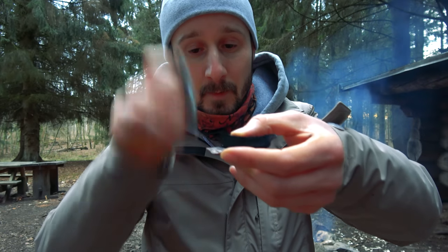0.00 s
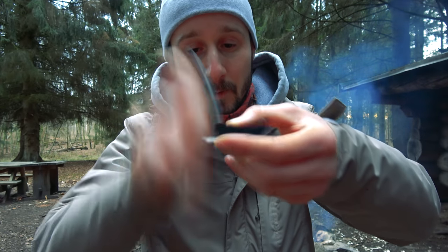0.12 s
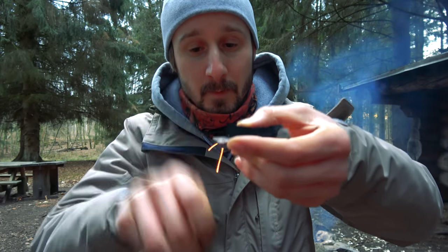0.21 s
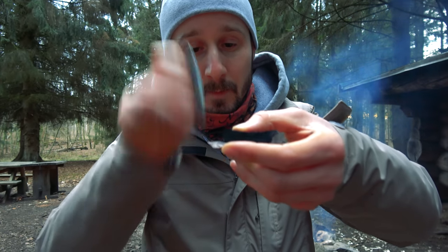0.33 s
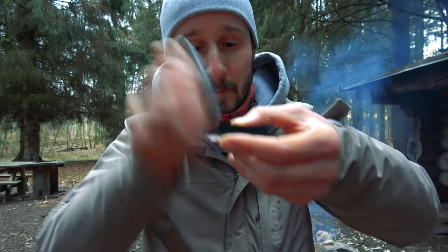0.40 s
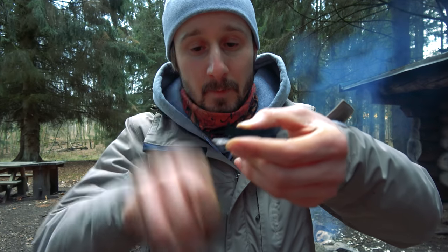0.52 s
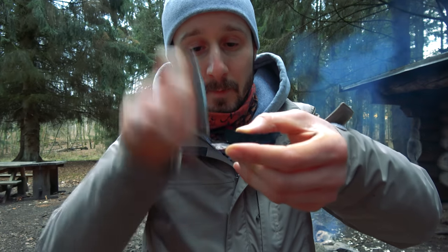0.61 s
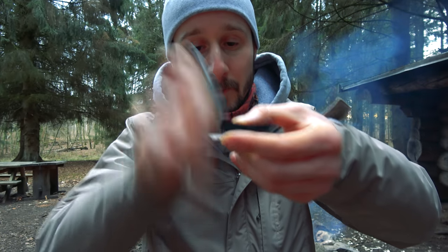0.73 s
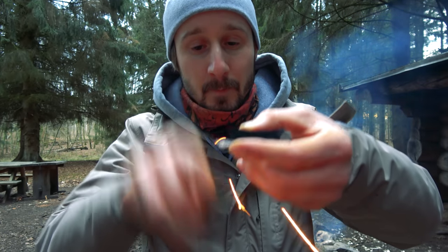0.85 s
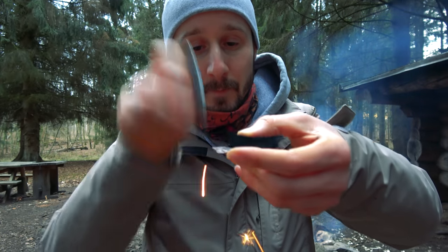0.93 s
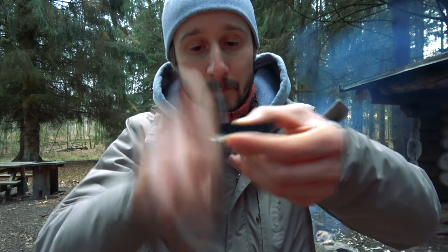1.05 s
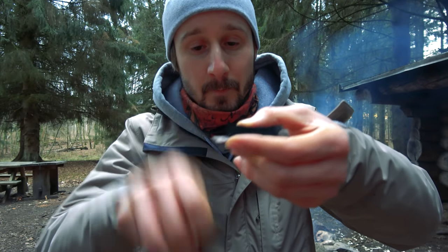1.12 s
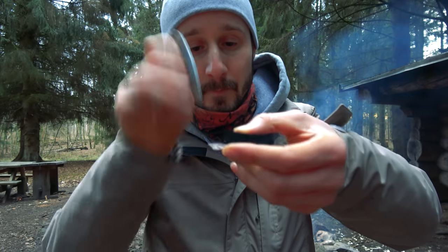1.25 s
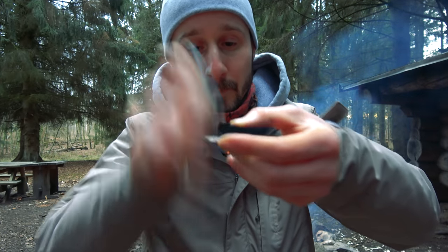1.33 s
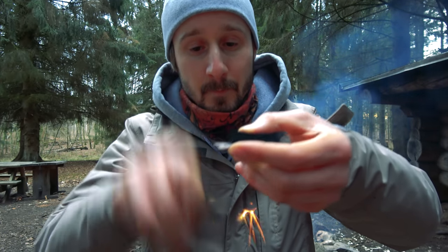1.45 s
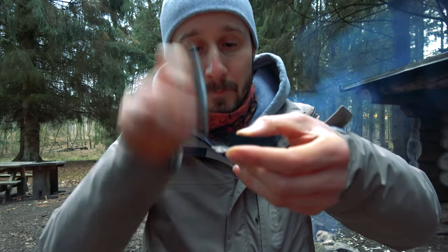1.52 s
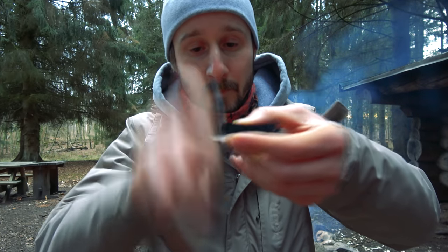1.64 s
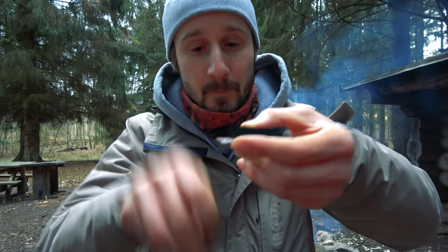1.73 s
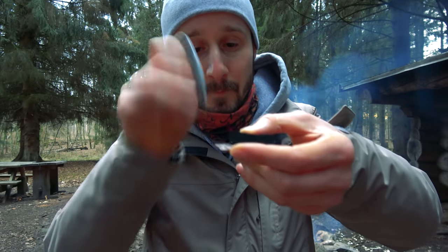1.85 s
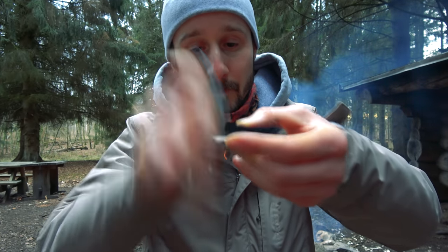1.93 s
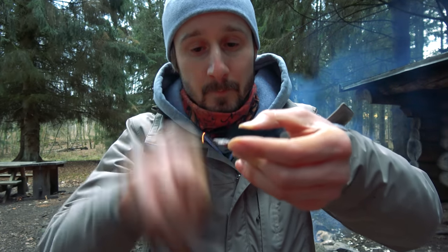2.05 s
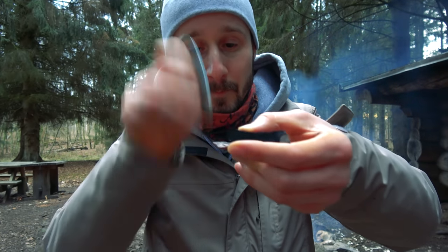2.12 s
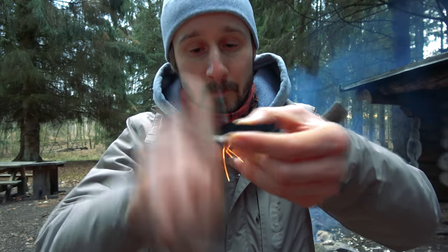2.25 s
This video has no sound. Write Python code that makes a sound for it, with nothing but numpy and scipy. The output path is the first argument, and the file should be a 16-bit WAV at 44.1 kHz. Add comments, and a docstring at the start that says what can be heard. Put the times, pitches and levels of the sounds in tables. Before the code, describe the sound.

A steel striker hits and scrapes a hand-held flint seven times at a steady pace, each a sharp crack with a tiny gritty rasp; soft cloth rustles between, close microphone in a quiet forest clearing.

```python
"""A steel fire striker is swung down the edge of a hand-held flint seven times, close by, in a quiet forest clearing.
Each stroke is an impulse (crack) and about 25 ms of gritty friction (scrape), both exciting damped modes;
the stone's edge chatters, each bite squeaks by stick-slip, and the passing hand leaves a low puff of air.
Light touches are weaker impulses on the same modes, and soft knocks pass through the hands.
A sleeve rustles and a jacket crinkles as shaped noise in steady air; decaying noise gives the trees' faint tail."""
import sys
import numpy as np
from scipy import signal
from scipy.fft import rfft, irfft, next_fast_len
from scipy.io import wavfile

SR = 44100
rng = np.random.default_rng(int(sys.argv[2]) if len(sys.argv) > 2 else 0)


def file_out(sig):
    """Save sig as 16-bit WAV at sys.argv[1]."""
    # one column per channel
    cols = np.atleast_2d(sig).T
    # limit, then scale
    lim = np.clip(cols, -1, 1)
    pcm = np.round(lim * 32767).astype(np.int16)
    wavfile.write(sys.argv[1], SR, pcm)


N = 101430   # samples in the scene
SPAN = 16384   # samples in one event
AGE = np.arange(SPAN) / SR   # s since the event began
TIME = np.arange(N) / SR   # s since the scene began


def from_db(db):
    """Logarithmic level: decibels become an amplitude ratio."""
    return 10 ** (np.asarray(db) / 20)


def add(out, start_s, x):
    """Superposition: sound x is summed into out from its start time."""
    i = max(int(start_s * SR), 0)
    out[i:i + len(x)] += x[:len(out) - i]


def coloured(x, points):
    """Minimum-phase filtering: the (hz, gain_db) curve fixes a causal response through its cepstrum."""
    size = 2 * next_fast_len(len(x))
    hz, gain_db = np.transpose(points)
    bin_hz = np.maximum(np.arange(size // 2 + 1) * SR / size, 1)
    gain = from_db(np.interp(np.log(bin_hz), np.log(hz), gain_db))
    cepstrum = irfft(np.log(gain))
    # Folding the negative half onto the positive half makes the filter causal
    cepstrum[1:size // 2] *= 2
    cepstrum[size // 2 + 1:] = 0
    response = np.exp(rfft(cepstrum))
    return irfft(rfft(x, size) * response)[:len(x)]


def noise(points):
    """Filtered random noise: a spectrum without pitch, scaled to rms 1."""
    x = coloured(rng.standard_normal(N + SPAN), points)[SPAN:]   # drops the filter's onset
    return x / x.std()


def ring(force, hz, t60_s):
    """Damped resonance: a unit click sets off a cosine of height 1 that falls 60 dB in t60_s."""
    decay = from_db(-60 / (t60_s * SR))   # per sample
    angle = 2 * np.pi * hz / SR
    zeros = [1, -decay * np.cos(angle)]
    poles = [1, -2 * decay * np.cos(angle), decay * decay]
    return signal.lfilter(zeros, poles, force + 1e-18)   # tiny offset avoids denormal numbers


def bump(t, centre_s, width_s):
    """Gaussian envelope: a bell-shaped swell of height 1, with width_s its standard deviation."""
    return np.exp(-.5 * ((t - centre_s) / width_s) ** 2)


# Spectrum of the outdoor air: pitch_hz, level_db
AIR_SPECTRUM = [(12, -14.5), (20, 8.5), (74, -2.5), (154, -3), (328, -10.5), (527, -13), (873, -13.5),
                (1000, -14), (1440, -20.5), (1610, -21), (3950, -26.5), (4420, -25.5), (6360, -27.5),
                (8180, -27), (16000, -41.5)]


def air():
    """Stationary noise: steady outdoor air of fixed spectrum."""
    return from_db(-48) * noise(AIR_SPECTRUM)


# Swells of the sleeve: centre_s, width_s, level_db
SLEEVE_RUSTLES = [(.14, 0.12, -53.5), (.6, .03, -51), (.79, 0.05, -47.5), (1.04, 0.046, -57),
                  (1.627, 0.011, -43.5), (1.675, 0.018, -49), (1.83, 0.033, -51.5), (1.95, 0.025, -52)]
# Spectrum of the sleeve: pitch_hz, level_db
SLEEVE_SPECTRUM = [(30, -9), (90, -3.5), (160, 7.5), (290, 0.5), (450, -11.5), (1000, -16), (3000, -30),
                   (16000, -43.5)]


def sleeve():
    """Amplitude-modulated friction noise: the swinging sleeve rustles in smooth swells."""
    swells = sum(from_db(db) * bump(TIME, centre_s, width_s) for centre_s, width_s, db in SLEEVE_RUSTLES)
    return swells * noise(SLEEVE_SPECTRUM)


# Swells of the dry jacket: centre_s, width_s, level_db
JACKET_CRINKLES = [(.075, 0.0095, -59), (.12, 0.011, -54.5), (.375, 0.011, -55.5), (0.458, 0.0059, -53.5),
                   (.695, 0.0055, -52.5), (0.819, 0.0019, -47), (.966, 0.0091, -54.5),
                   (1.059, 0.0087, -54.5), (2.233, 0.0061, -50)]
# Spectrum of the jacket: pitch_hz, level_db
JACKET_SPECTRUM = [(300, -25), (1500, 5.5), (4000, -1.5), (8000, 1), (12000, -4), (16000, -4)]
CRINKLE_ROUGH_DB, CRINKLE_GRAIN_S = 4.5, 0.001   # spread and spacing of the random level


def jacket():
    """Irregular modulation: a random level every millisecond roughens the noise of dry crinkling cloth."""
    swells = sum(from_db(db) * bump(TIME, centre_s, width_s) for centre_s, width_s, db in JACKET_CRINKLES)
    rough = np.interp(TIME / CRINKLE_GRAIN_S, np.arange(N), rng.standard_normal(N))
    return swells * from_db(CRINKLE_ROUGH_DB * rough) * noise(JACKET_SPECTRUM)


GRAINS_PER_S, GRAIN_SPREAD_DB = 9000, 5.5


def grit():
    """Random impulse train: dense micro-fractures of uneven size and either sign, scaled to rms 1."""
    spread = np.clip(rng.standard_normal(SPAN), -2, 2)
    sizes = from_db(GRAIN_SPREAD_DB * spread) * rng.choice([-1, 1], SPAN)
    grains = sizes * (rng.random(SPAN) < GRAINS_PER_S / SR)
    return grains / grains.std()


# Spectrum of the crushed grit: pitch_hz, level_db
CRUSH_SPECTRUM = [(300, -21), (1500, -4), (4000, -1.5)]
CRUSH_DB, CRUSH_DECAY_S = -9, .001


def blow():
    """Impulsive excitation: one sharp click, then a short decaying crush of grit."""
    crush = coloured(grit() * np.exp(-AGE / CRUSH_DECAY_S), CRUSH_SPECTRUM)
    return np.where(AGE == 0, 1, from_db(CRUSH_DB) * crush)


# Damped modes of the gripped steel and stone: pitch_hz, level_db (relative), t60_s
BODY_MODES = [(1500, -20.5, 0.013), (2044, -8, 0.015), (2644, -4.5, 0.011), (3150, -6, 0.0065),
              (3810, -6.5, 0.0053), (4155, -9, 0.017), (4634, -3, .013), (5370, -14.5, .010),
              (7180, 0, 0.0053), (8080, 6.5, 0.0058), (10630, 2, 0.01), (11010, -0.5, 0.0081),
              (12250, -6, .007), (15200, -14, .007)]
# Faint after-ring of the steel: pitch_hz, level_db (relative), t60_s
STEEL_AFTER_RING = [(4575, -57, .2), (10750, -51, .3), (10930, -51, .3), (11120, -49, .25)]
CLACK_HZ, MIDDLE_LOW_HZ, MIDDLE_HIGH_HZ, SHEEN_HZ = 2000, 4200, 7400, 10500
GRIP_SPREAD_DB, GRIP_DETUNE = 2.0, 0.0043   # greatest change either way; detune is a fraction
DIRECT_DB = 11.5


def steel_on_flint(force, spectrum, clack_db, sheen_db):
    """Modal excitation: the contact point balances low clack and high sheen; force sounds directly and in modes."""
    balance = [(CLACK_HZ, clack_db), (MIDDLE_LOW_HZ, 0), (MIDDLE_HIGH_HZ, 0), (SHEEN_HZ, sheen_db)]
    force = coloured(coloured(force, spectrum), balance)
    body = np.zeros(SPAN)
    for hz, db, t60_s in BODY_MODES:
        # The grip alters each mode's level and pitch from contact to contact
        level_shift, pitch_shift = rng.uniform(-1, 1, 2)
        gain = from_db(db + GRIP_SPREAD_DB * level_shift)
        body += gain * ring(force, hz * (1 + GRIP_DETUNE * pitch_shift), t60_s)
    after = sum(from_db(db) * ring(force, hz, t60_s) for hz, db, t60_s in STEEL_AFTER_RING)
    return from_db(DIRECT_DB) * force + (body + after) / 2


# Light touches and ticks: start_s, level_db (relative), clack_db, sheen_db, pitch_hz
LIGHT_TOUCHES = [(0.0263, -31, 4.5, -13, 1750), (.0310, -37, 5, -5, 1560), (.3290, -41, 2, -14, 1700),
                 (0.3924, -32.5, 3, -14, 2850), (.6524, -15, -3.5, -10.5, 2170),
                 (1.0012, -37.5, -1.5, -11, 1620), (1.0132, -37, 6, -3.5, 2200),
                 (1.089, -45.5, 5, -2, 3020), (1.5464, -38.5, 5, -8, 2970), (1.55, -37.5, -3, -8, 2320),
                 (2.0605, -42, 13, -20, 2300), (2.0911, -38, 0.5, -6.5, 2930),
                 (2.1822, -24.5, 7.5, -16, 1320), (2.2291, -46.5, 9, -13, 2700)]
# Spectrum of a light contact: pitch_hz, level_db
TOUCH_SPECTRUM = [(100, -15.5), (500, 2.5), (1000, 8.5), (1500, 7.5), (2300, -3.5), (3600, -2.5),
                  (4650, -4), (5500, -10), (8400, -0.5), (11000, -2.5), (16000, 5.5)]
TOUCH_DB, TOUCH_RING_DB, TOUCH_RING_T60_S = -6.5, 0, 0.0097


def touches():
    """Weak impact: each light contact excites the shared modes and a short ring of its own pitch."""
    out = np.zeros(N)
    for start_s, db, clack_db, sheen_db, hz in LIGHT_TOUCHES:
        tick = steel_on_flint(blow(), TOUCH_SPECTRUM, clack_db, sheen_db)
        tick = tick + from_db(TOUCH_RING_DB) * ring(AGE == 0, hz, TOUCH_RING_T60_S)
        add(out, start_s, from_db(TOUCH_DB + db) * tick)
    return out


# Scatter from hands and chest, the ground, the trees: level_db, delay_s, t60_s
SCATTERERS = [(-17, 0.00077, 0.025), (-28, 0.013, 0.12), (-34, 0.028, 0.24)]
# Spectrum of the scattered sound: pitch_hz, level_db
SCATTER_SPECTRUM = [(200, -0.5), (1000, 7), (2700, -4.5), (4400, -3), (6000, -2), (8150, -2.5), (9400, 5.5),
                    (10900, -8.5), (12000, -5), (13800, -6), (16000, -9)]


def clearing(close):
    """Diffuse reflection: delayed, decaying noise is convolved with the close sounds."""
    echoes = np.zeros(SPAN)
    for db, delay_s, t60_s in SCATTERERS:
        echo = rng.standard_normal(SPAN) * (AGE > delay_s) * from_db(-60 * AGE / t60_s)
        echoes += from_db(db) * echo / np.linalg.norm(echo)   # unit energy before its level
    return signal.fftconvolve(close, coloured(echoes, SCATTER_SPECTRUM))[:N]


# Soft knocks through the hands: start_s, level_db
HAND_KNOCKS = [(0.215, -27.5), (.518, -46), (0.813, -28.5), (.8224, -29.5), (1.1214, -38), (1.4204, -30),
               (1.7216, -52.5), (2.021, -25)]
# Damped modes of the hands: pitch_hz, level_db (relative to the knock), t60_s
HAND_RESONANCES = [(186.6, 3, 0.0073), (580, 3.5, 0.0063)]


def knocks():
    """Heavily damped resonance: the hands take each blow with a dull, low knock."""
    out = np.zeros(N)
    for start_s, level_db in HAND_KNOCKS:
        for hz, db, t60_s in HAND_RESONANCES:
            add(out, start_s, -from_db(level_db + db) * ring(AGE == 0, hz, t60_s))
    return out


# Instants when the edge bites deeper and the steel squeaks: centre_s, level_db (relative), pitch_hz (squeak)
EDGE_BITES = [(.2247, 8, 11000), (.2305, 5, 10900), (.2330, 6, 11150), (.2380, 3, 8200), (.2400, 6, 10900),
              (.5223, 5, 3700), (.5287, 9, 11200), (.5303, 7, 11400), (.5325, 7, 10700), (.5366, 5, 8000),
              (.8312, 5, 10800), (.8360, 4, 11200), (.8402, 6, 4500), (1.1312, 8, 11200),
              (1.1376, 4, 10950), (1.1444, 5, 4600), (1.4275, 3, 10650), (1.4294, 8, 10900),
              (1.4438, 2, 8100), (1.7433, 3, 11000), (2.0240, 8, 4600), (2.0352, 3, 10800),
              (2.0388, 4, 11100)]
BITE_WIDTH_S, SCRAPE_RISE_S, SCRAPE_RELEASE_S = 0.0013 / 2, 0.0027, 0.00069


def scrape(start_s, length_s):
    """Sliding friction: pressure shapes grit under the steel, and its power surges at each bite."""
    rise = 1 - np.exp(-AGE / SCRAPE_RISE_S)
    release = np.exp(-np.maximum(AGE - length_s, 0) / SCRAPE_RELEASE_S)
    surges = sum(from_db(db) ** 2 * bump(start_s + AGE, centre_s, BITE_WIDTH_S)
                 for centre_s, db, _ in EDGE_BITES)
    return grit() * rise * release * np.sqrt(1 + surges / 2)


CHATTER_DB, CHATTER_T60_S, CHATTER_CENTRE_S, CHATTER_WIDTH_S = -35, .008, .0075, .004


def chatter(hz):
    """Forced resonance: grit rattles the stone's edge at a pitch set by the contact point, then it settles."""
    force = grit() * bump(AGE, CHATTER_CENTRE_S, CHATTER_WIDTH_S)
    return from_db(CHATTER_DB) * ring(force, hz, CHATTER_T60_S)


PUFF_DB, PUFF_DELAY_S, PUFF_WIDTH_S = -33.5, .0395, 0.0027
REFILL_DB, REFILL_DELAY_S, REFILL_WIDTH_S = -37, 0.053, .009


def puff():
    """Aerodynamic pressure pulse: suction behind the passing fist, then air flowing back."""
    suction = from_db(PUFF_DB) * bump(AGE, PUFF_DELAY_S, PUFF_WIDTH_S)
    refill = from_db(REFILL_DB) * bump(AGE, REFILL_DELAY_S, REFILL_WIDTH_S)
    return refill - suction


# Strokes, levels relative: start_s, crack_db, scrape_length_s, scrape_db, crack_clack_db, crack_sheen_db,
# scrape_clack_db, scrape_sheen_db, chatter_hz, chatter_db
STRIKER_STROKES = [(.2160, 0.5, 0.027, -0.5, 0.5, 6, 0, 2.5, 3370, -4),
                   (.5180, -2, 0.022, -1.5, -1.5, -10.5, 1.5, 2.5, 3700, 1.5),
                   (0.822, 3, 0.024, -2, -1, 4, 3, -3, 4380, 7),
                   (1.1211, 3, 0.025, 2, -0.5, -4, 0, -2.5, 5380, 5),
                   (1.4206, 2, 0.025, -2.5, 2.5, -1, 2.5, 1, 2850, -28),
                   (1.7229, 0, 0.023, 0, -4, -11.5, -2.5, -1.5, 1600, 4),
                   (2.019, -2, 0.022, -2.5, 6.5, 4, 8.5, -2.5, 3900, 4)]
# Spectrum of the crack: pitch_hz, level_db
CRACK_SPECTRUM = [(100, -3), (300, -5), (600, 3), (950, -7), (1800, 3.5), (4000, -0.5), (7000, -5.5),
                  (9400, -16.5), (11000, -1), (13000, -0.5), (16000, -5.5)]
# Spectrum of the scrape: pitch_hz, level_db
SCRAPE_SPECTRUM = [(100, -9.5), (300, -10.5), (600, -7), (950, -9), (1800, -5.5), (4000, 0.5), (7000, -2.5),
                   (9400, -4), (11000, 0.5), (13000, -4.5), (16000, -3.5)]
CRACK_DB, SCRAPE_DB = -6.5, -36.5


def strokes():
    """Impact followed by friction: each stroke sums crack, scrape, chatter and the moving hand's puff."""
    out = np.zeros(N)
    for (start_s, crack_db, length_s, scrape_db, crack_clack_db, crack_sheen_db,
         scrape_clack_db, scrape_sheen_db, chatter_hz, chatter_db) in STRIKER_STROKES:
        crack = steel_on_flint(blow(), CRACK_SPECTRUM, crack_clack_db, crack_sheen_db)
        friction = scrape(start_s, length_s)
        slide = steel_on_flint(friction, SCRAPE_SPECTRUM, scrape_clack_db, scrape_sheen_db)
        add(out, start_s, from_db(CRACK_DB + crack_db) * crack)
        add(out, start_s, from_db(SCRAPE_DB + scrape_db) * slide)
        add(out, start_s, from_db(chatter_db) * chatter(chatter_hz) + puff())
    return out


SQUEAK_DB, SQUEAK_WIDTH_S = -21, .0007
WOBBLE_DEPTH, WOBBLE_S = .025, 0.00063   # fraction of pitch, spacing of its random values


def squeaks():
    """Stick-slip oscillation: each bite sounds a brief tone of unsteady pitch."""
    out = np.zeros(N)
    for centre_s, db, hz in EDGE_BITES:
        wobble = np.interp((TIME - centre_s) / WOBBLE_S, np.arange(-10, 10), rng.standard_normal(20))
        phase = 2 * np.pi * np.cumsum(hz * (1 + WOBBLE_DEPTH * wobble)) / SR
        out += from_db(SQUEAK_DB + db) * bump(TIME, centre_s, SQUEAK_WIDTH_S) * np.sin(phase)
    return out


def scene():
    """Superposition of close sources, their reflections and the background, as one channel."""
    background = air() + sleeve() + jacket()
    close = touches() + knocks() + strokes() + squeaks()
    return (close + clearing(close) + background)[None]


OVERLOAD, CUTOFF_HZ = .92, 15750   # clipping amplitude, top of the passband


def record(dry):
    """Overload and band limiting: peaks are clipped flat, then a steep low-pass cuts the top."""
    clipped = np.clip(dry, -OVERLOAD, OVERLOAD)
    low_pass = signal.ellip(10, .2, 70, CUTOFF_HZ, fs=SR, output="sos")   # order, ripple dB, rejection dB
    return signal.sosfilt(low_pass, clipped)


dry = scene()
out = record(dry)
file_out(out)
```